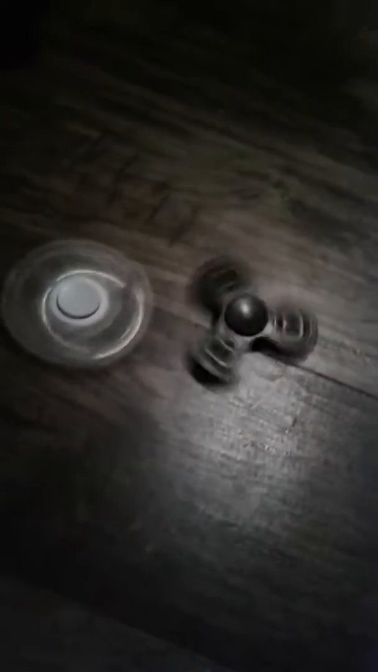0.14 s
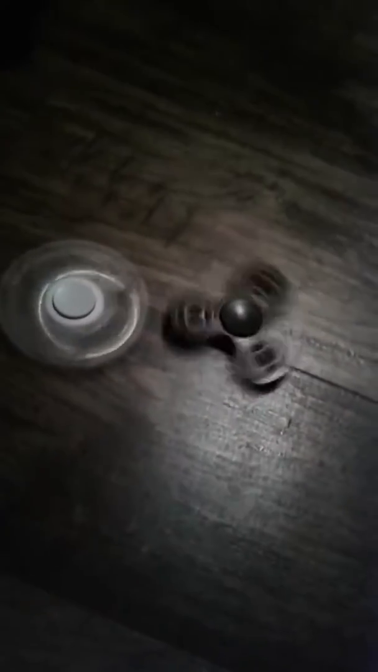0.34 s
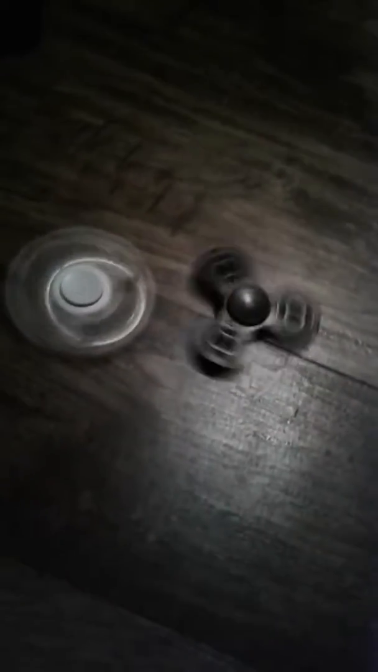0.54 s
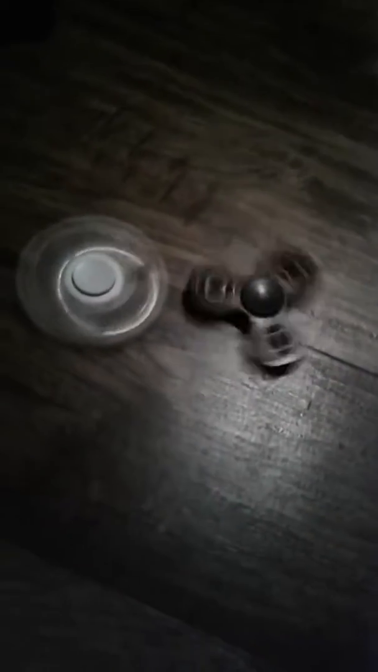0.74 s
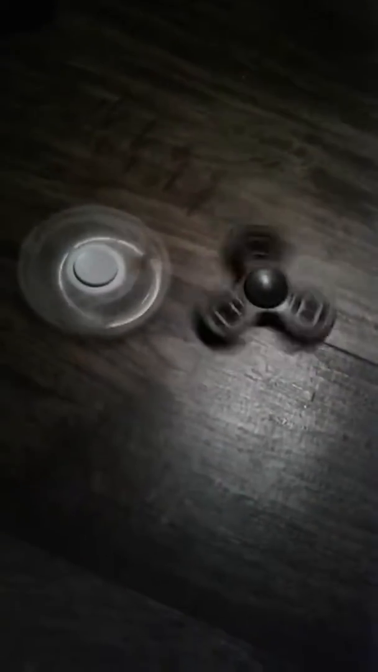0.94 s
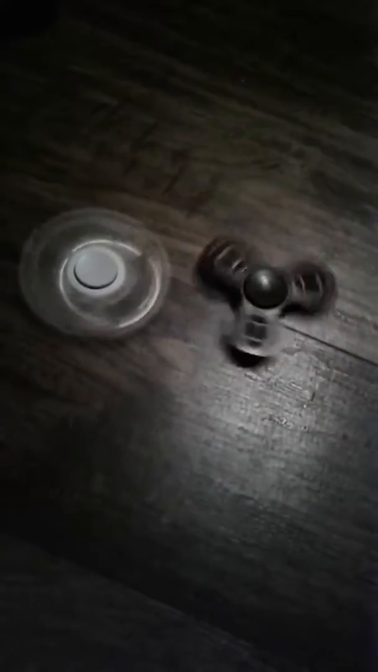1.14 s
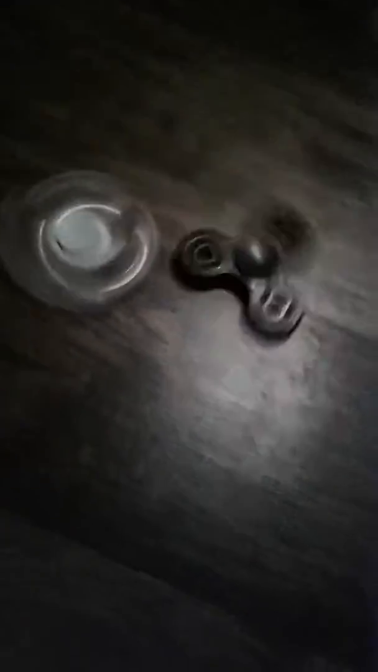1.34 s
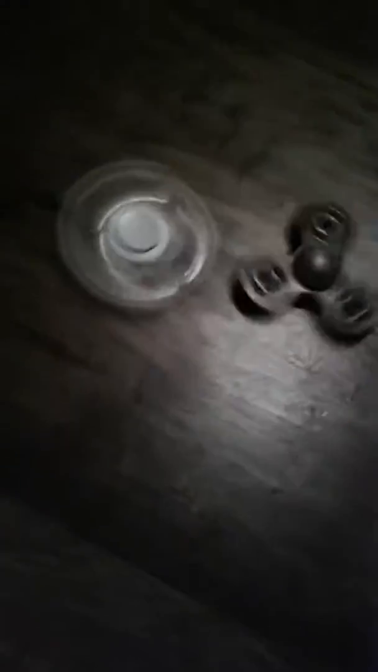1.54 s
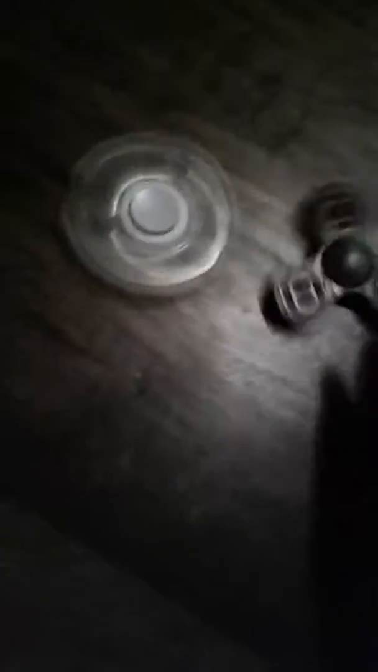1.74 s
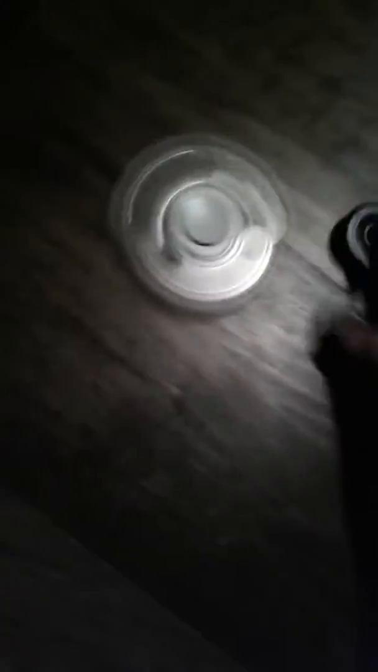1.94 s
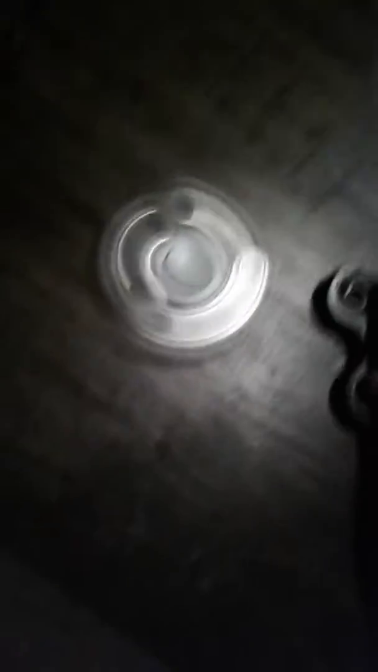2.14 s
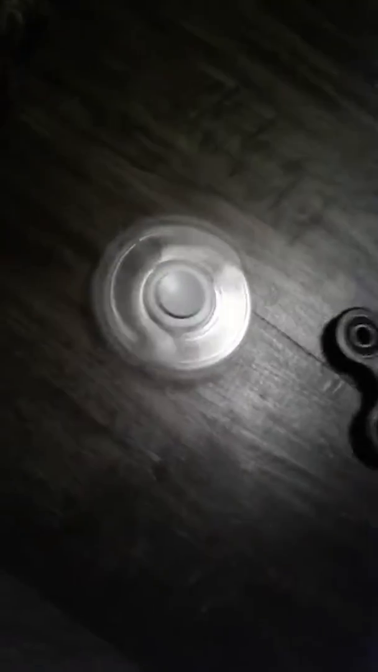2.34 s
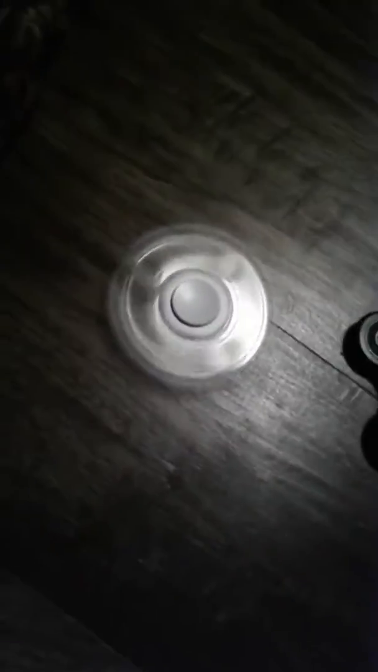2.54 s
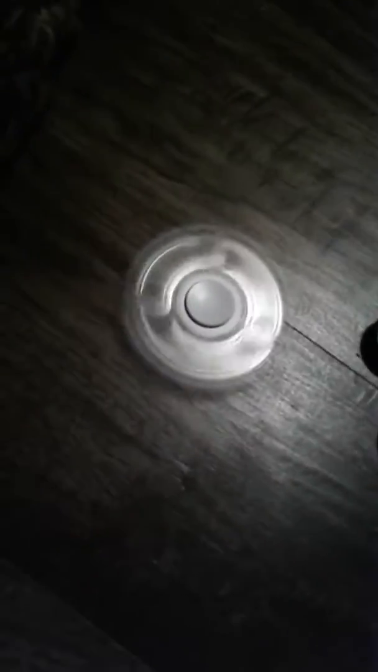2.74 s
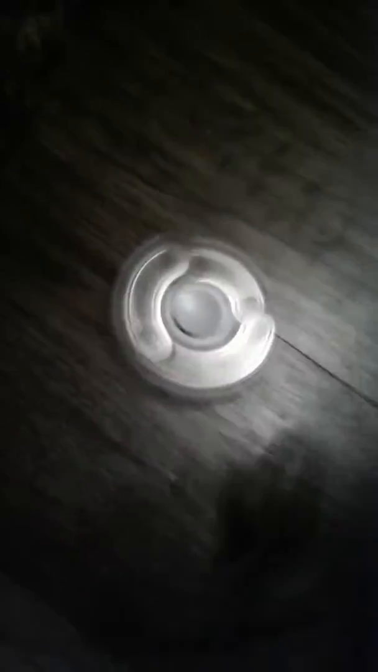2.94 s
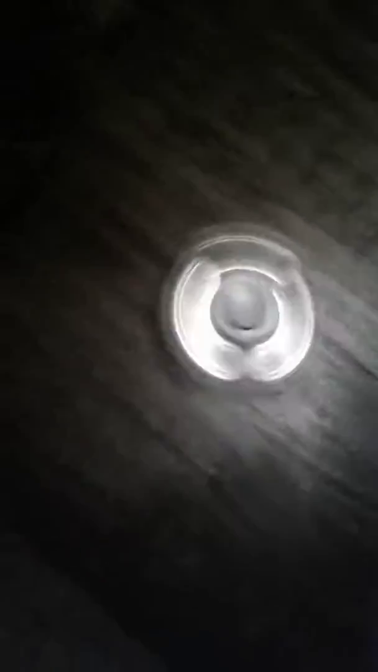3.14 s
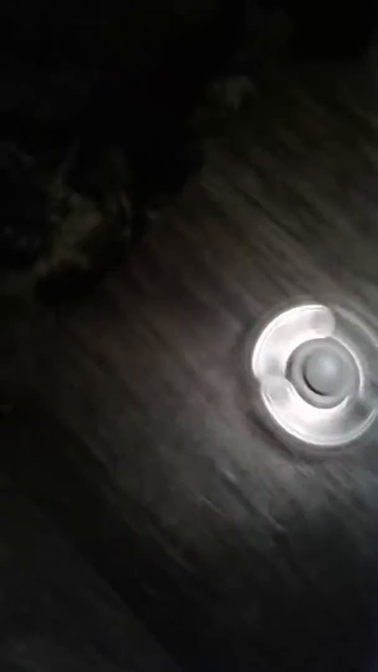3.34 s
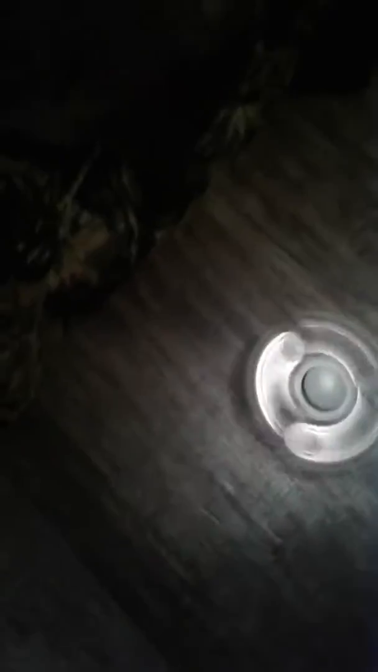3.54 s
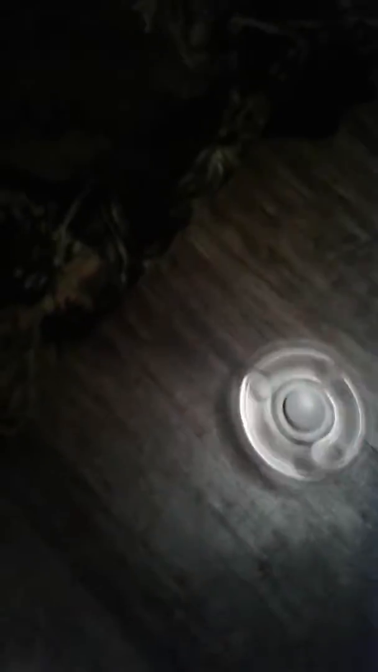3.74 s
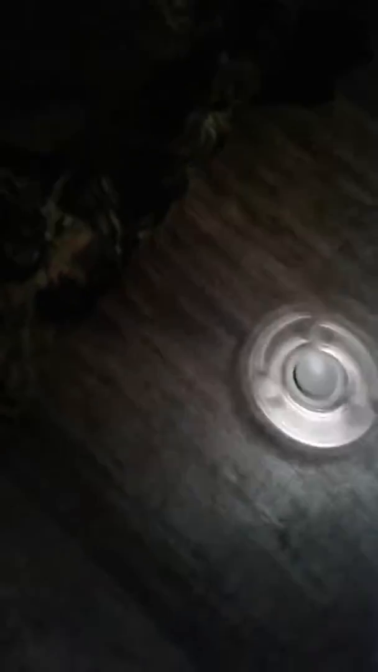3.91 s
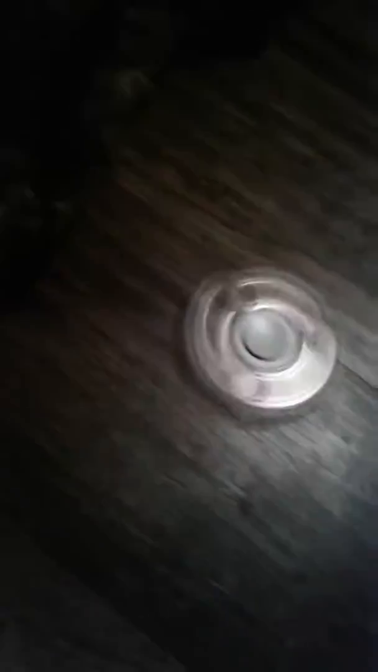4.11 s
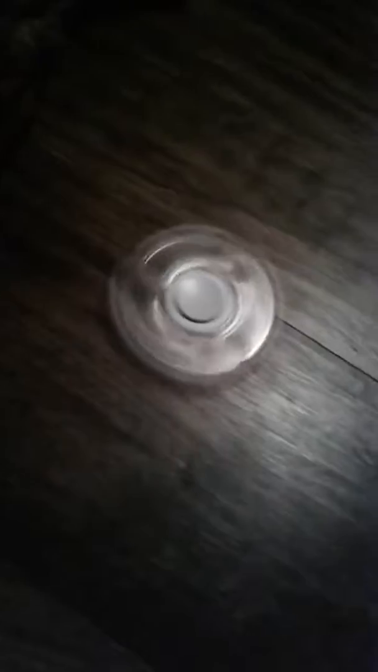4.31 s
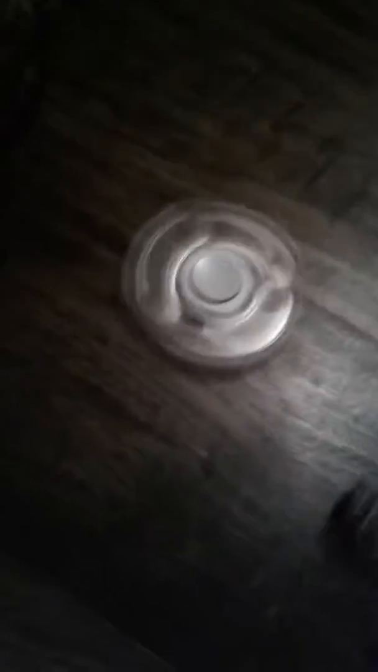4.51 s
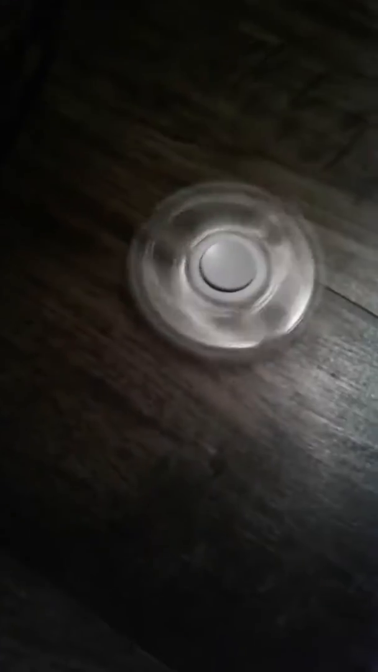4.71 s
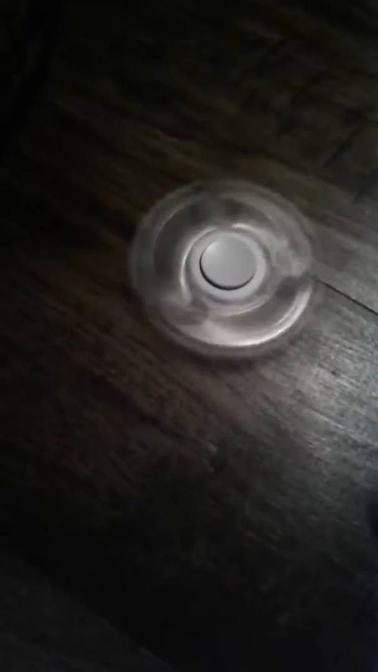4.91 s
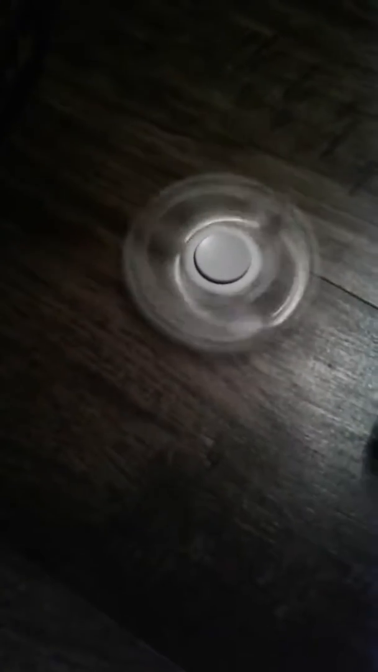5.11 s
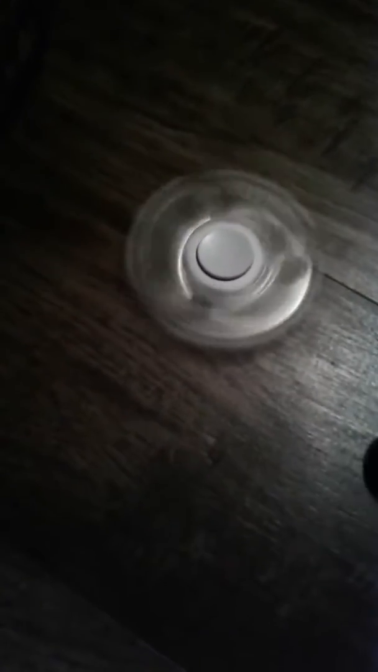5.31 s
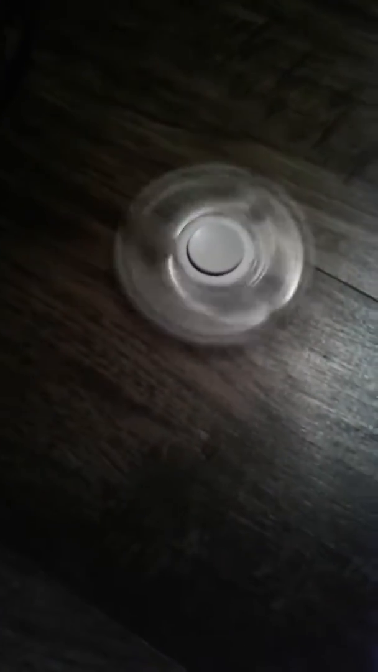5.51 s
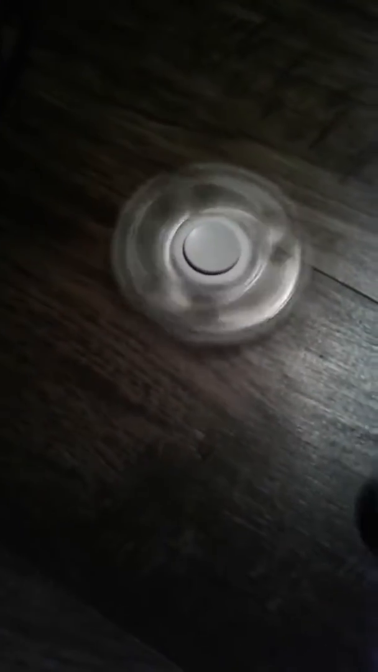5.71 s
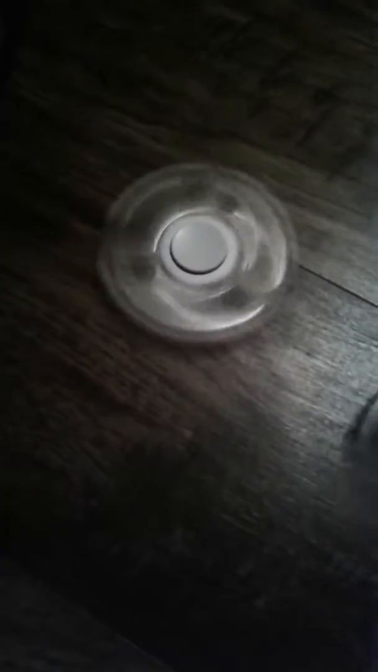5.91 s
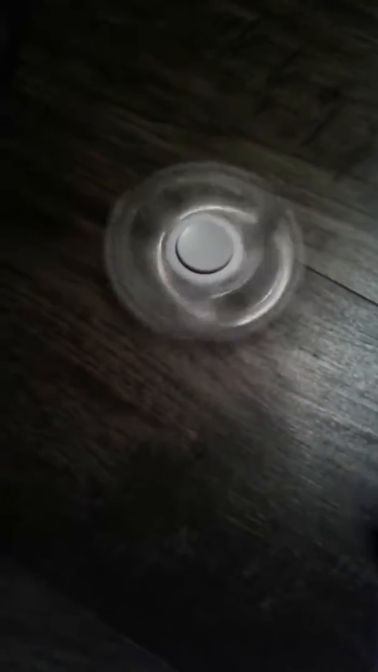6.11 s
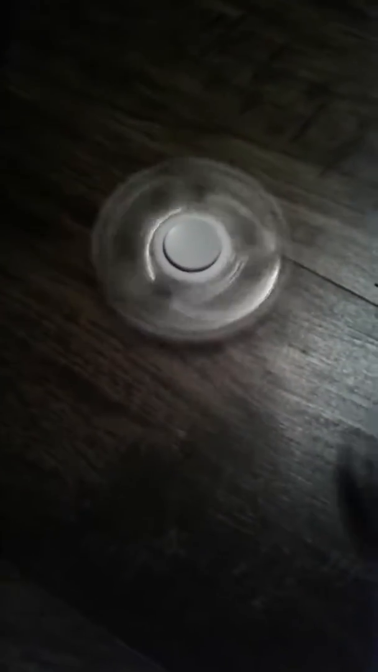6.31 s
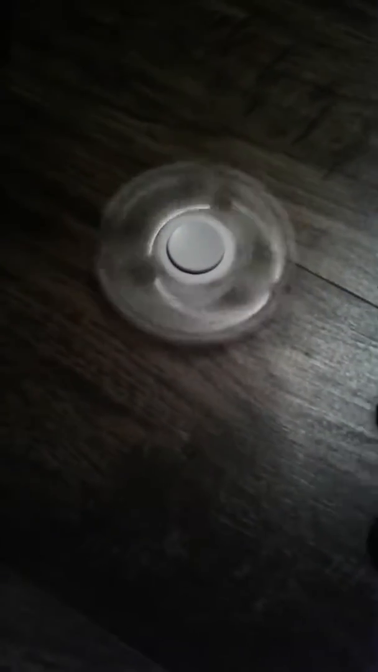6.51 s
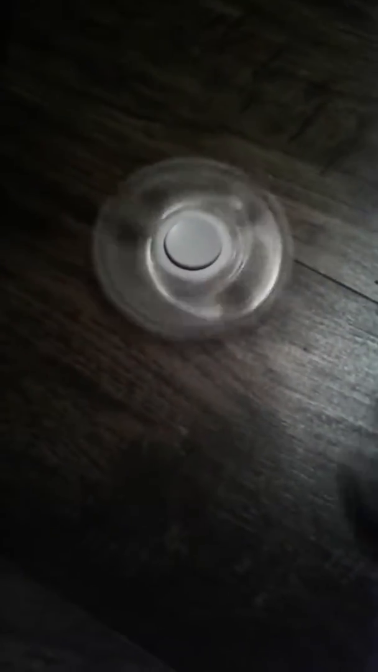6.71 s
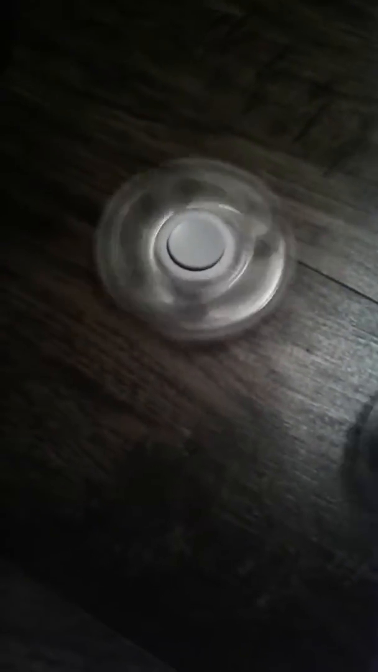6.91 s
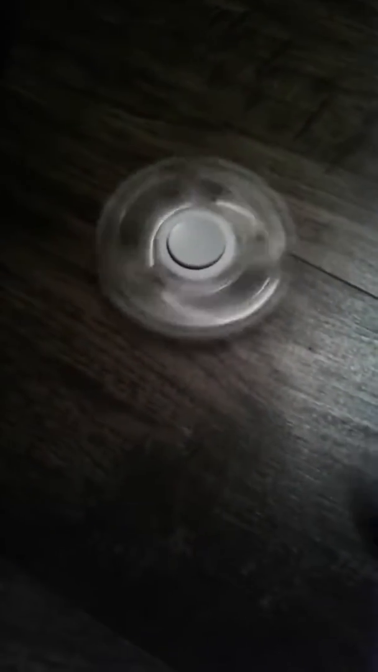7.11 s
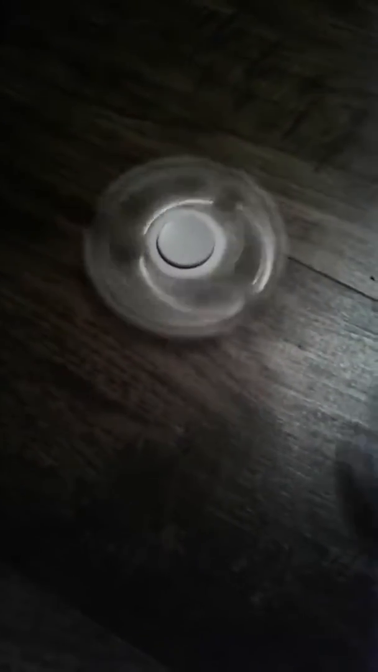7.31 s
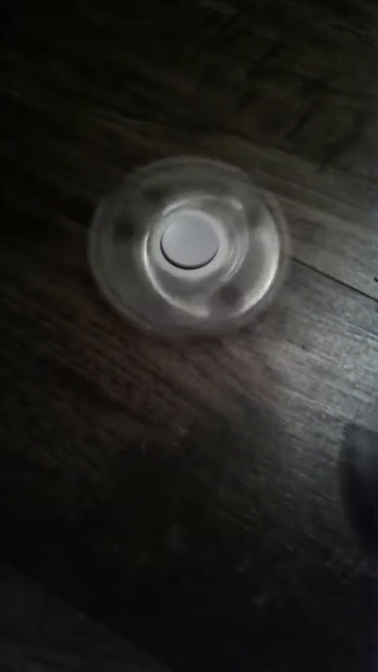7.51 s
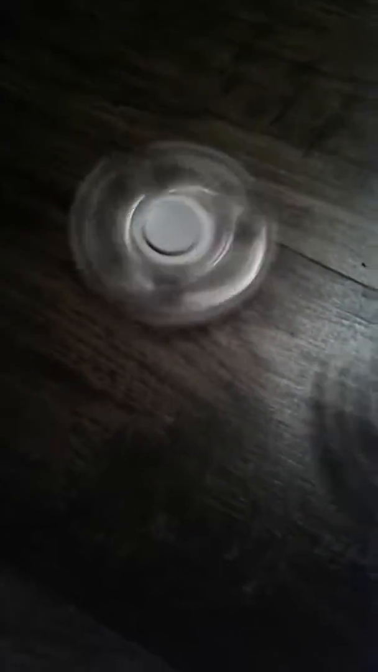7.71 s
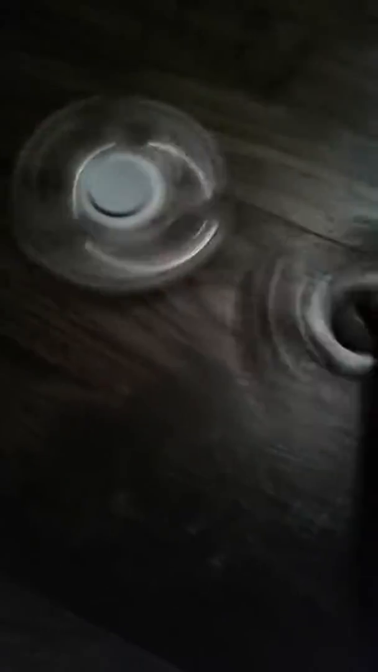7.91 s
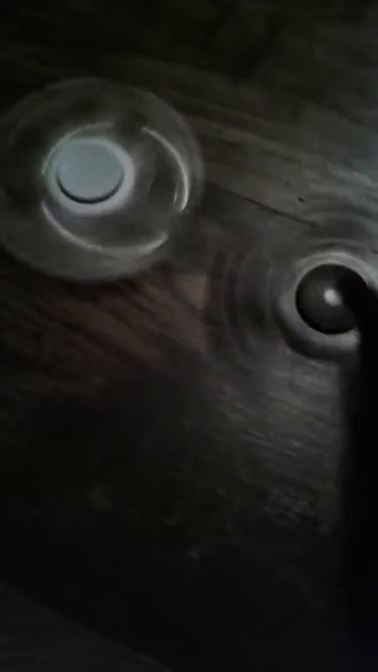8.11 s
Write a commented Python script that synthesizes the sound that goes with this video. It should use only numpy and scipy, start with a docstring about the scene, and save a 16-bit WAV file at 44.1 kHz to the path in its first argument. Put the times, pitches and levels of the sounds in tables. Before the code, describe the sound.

Close to a phone microphone in a small furnished room, a plastic spinner whirs continuously on a wooden table, a quiet hissy flutter. A light clack comes first, then a sudden loud burst of clattering plastic with woody thumps, a smaller knock, a short fizzy scrape, and finally scattered soft taps and low booms.

```python
"""A plastic spinner whirs on its ball bearing on a wooden table, close to a phone's microphone.
The whir is noise through the bearing's resonances plus stirred air, blended from far, side-on and overhead.
A hand drags, drops and flicks a second spinner beside it: gliding noise scrapes and noisy, ringing clacks.
Dull knocks, trembling and booms come from the table top's modes; a faint low murmur lies behind."""
import sys
import numpy as np
from scipy import signal
from scipy.fft import rfft, irfft, next_fast_len
from scipy.io import wavfile
from scipy.ndimage import uniform_filter1d, map_coordinates

SR = 44100
rng = np.random.default_rng(int(sys.argv[2]) if len(sys.argv) > 2 else 0)


def inscribe(sig):
    """Save sig as 16-bit PCM at rate SR to the path in sys.argv[1].

    A 1-D sig is mono; a 2-D sig holds one channel per row.
    Samples are clipped to [-1, 1] before scaling.
    """
    pcm = np.round(np.clip(np.atleast_2d(sig).T, -1, 1) * 32767)
    wavfile.write(sys.argv[1], SR, pcm.astype(np.int16))


N = 359415  # samples

# Low murmur behind the table. Each row: frequency in Hz, level in dB per Hz.
MURMUR_SPECTRUM = [(15, -30), (30, -14), (60, -19), (110, 1.5), (160, -15), (250, -27), (400, -120)]
# Resonances of the wooden top. Each row: centre in Hz, width in Hz, level in dB.
TABLE_MODES = [(160.4, 9.2, -6.5), (237.3, 27, 2), (344.4, 78, -2), (376.2, 92.4, -6), (578, 84, -18.5),
               (924, 250, -26)]
# Trembling of the table top, before its random unevenness. Each row: time in seconds, level in dB.
TREMBLE_LEVEL = [(0.0, -55), (1.13, -59), (2.31, -48), (2.56, -53), (2.97, -55.5), (3.13, -43), (3.22, -37),
                 (3.45, -59), (3.79, -52.5), (3.97, -51), (4.63, -41.5), (4.79, -47.5), (5.31, -48),
                 (7.58, -51), (7.83, -43), (8.15, -52.5)]
# Dull knocks in the wood. Each row: start in seconds, peak in dB, favoured tone in Hz.
KNOCKS = [(0.116, -52, 366), (0.181, -35, 354), (0.238, -36, 246), (0.263, -35.5, 264), (0.382, -51, 245),
          (0.425, -35, 270), (0.568, -42.5, 260), (0.672, -42, 272), (0.747, -48, 250), (1.141, -36, 336),
          (1.332, -36, 320), (1.39, -40, 260), (1.564, -36.5, 246.6), (1.584, -31.5, 250),
          (1.668, -43, 223), (1.78, -36, 261), (1.838, -42, 350), (2.042, -27, 340), (2.201, -43, 256),
          (2.354, -33.5, 280), (2.951, -14, 336), (3.042, -22.5, 257), (3.071, -19, 247), (3.11, -25, 251),
          (3.161, -23.5, 343), (3.245, -19.5, 330), (3.328, -24.5, 260), (3.365, -29, 347),
          (3.411, -35, 266), (3.752, -25, 348), (3.771, -16.5, 440), (3.948, -26.5, 377), (3.995, -27, 269),
          (4.136, -36, 330), (4.188, -29.5, 422), (4.23, -33, 265), (4.277, -29.5, 262), (4.565, -35, 256),
          (4.717, -30.5, 267), (4.859, -42, 249), (4.959, -37, 242), (5.002, -36, 266), (5.279, -43, 256),
          (5.341, -34.5, 261), (5.417, -29.5, 269), (5.619, -41, 274), (5.752, -48, 260), (5.786, -32, 212),
          (5.907, -40, 245), (6.155, -29.5, 260), (6.607, -25.5, 229), (6.739, -36, 275), (7.145, -32, 218),
          (7.295, -36, 236), (7.379, -37, 267), (7.487, -38.5, 256.4), (7.572, -49, 248), (7.605, -45, 230),
          (7.782, -35.5, 244), (7.955, -36, 260)]
# Firm touches shake the wood and boom in the table's frame, levels before their soft onsets.
# Each row: start in seconds, shake level in dB, boom level in dB, boom tone in Hz, boom t60 in seconds.
FIRM_TOUCHES = [(.96, -52, -39, 60, .1), (2.05, -32.5, -29, 107, .23), (2.949, -24, -25, 75, .12),
                (3.078, -27, -16, 68, .1), (3.12, -30, -31, 106, .35), (3.3, -30, -33, 103, .3),
                (3.764, -35, -36, 106, .3), (4.0, -31, -36, 109.5, .35), (5.362, -51, -41, 95, .25),
                (5.41, -39.5, -43, 80, .29), (5.77, -33.5, -38, 104, .33), (6.151, -31.5, -32, 108, .21),
                (6.589, -25, -23, 108.7, .25), (7.148, -29, -36, 102.5, .4)]

# Hard contacts, levels before mixing.
# Each row: start in seconds, snap and ring level in dB, middle tone level in dB, middle tone in Hz, t60 in seconds.
CLACKS = [(0.427, -36, -56, 596, .015), (.9594, -52, -40, 835, 0.02), (1.331, -42, -48, 620, .012),
          (2.0336, -23, -31.5, 594, 0.0095), (2.045, -21, -19, 950, 0.012), (2.057, -25, -30, 1180, 0.015),
          (2.074, -30, -43, 930, 0.018), (2.091, -24, -39, 960, .01), (2.9481, -16, -25, 580, .018),
          (2.9551, 0, -12, 1015, 0.013), (2.9722, -16, -22.5, 1000, 0.035), (3.0413, -8, -13.5, 910, 0.015),
          (3.0738, 2.5, -11.5, 920, 0.0086), (3.0816, 0.5, -10.5, 850, 0.01),
          (3.0973, -16, -10.5, 600, 0.0083), (3.1105, 2.5, -9, 570, 0.011), (3.125, -28, -23, 630, 0.026),
          (3.1502, -12, -34, 820, 0.038), (3.1695, -12.5, -31, 657, 0.032), (3.1855, -16, -33, 1050, 0.023),
          (3.206, -25, -22, 634, 0.013), (3.2354, -14, -36, 755, 0.028), (3.2474, -23, -17.5, 564, 0.0096),
          (3.269, -13.5, -29, 877, 0.017), (3.3114, -21.5, -43, 810, 0.026), (3.331, -19, -38, 666, 0.015),
          (3.3682, -33.5, -53, 830, 0.023), (3.753, -43, -37, 600, .01), (3.7655, -12, -16.5, 630, .015),
          (3.7742, -14, -15, 1150, .016), (3.996, -34, -27, 1150, 0.02), (4.0297, -30, -52, 654, .016),
          (4.0787, -29.5, -41, 600, 0.013), (4.143, -22.5, -39, 1130, 0.014),
          (5.3357, -25, -45, 1130, .013), (5.3982, -31, -40, 1510, 0.039), (5.4115, -26, -30, 1350, 0.029),
          (5.4264, -24, -41, 1340, 0.012), (5.7728, -22.5, -34.5, 1230, 0.014),
          (5.804, -28, -42.5, 608, 0.015), (5.8134, -22.5, -41, 641, .013), (6.1563, -30, -45, 1260, .017),
          (6.175, -28, -44, 1320, 0.02), (6.592, -33, -48, 595, .014), (6.6005, -22, -38.5, 1000, 0.022),
          (6.606, -19, -27, 1290, 0.0073), (6.6274, -33, -38, 1200, 0.021),
          (6.66, -22.5, -37.5, 620, 0.017), (6.721, -38, -53, 1940, .018), (7.1469, -29.5, -50, 678, 0.023),
          (7.1707, -24, -36, 994, 0.029), (7.1926, -28, -35, 630, .013)]
# Rings of the plastic, before a small random spread. Each row: frequency in Hz, level in dB, t60 in seconds.
PLASTIC_RINGS = [(6420, 19, 0.0069), (8000, -28.5, .025), (8100, -26, .02), (9500, -15, .035),
                 (9880, 5.5, 0.019)]
# The crack of a contact. Each row: frequency in Hz, level in dB per Hz.
CRACK_SPECTRUM = [(900, -120), (1600, 3), (2300, 3.5), (3500, 7), (4800, 3), (6500, -120)]
# The brighter snap of a contact. Each row: frequency in Hz, level in dB per Hz.
SNAP_SPECTRUM = [(2650, -32), (4500, -9), (5720, -7), (6800, -5), (7220, 0), (8830, 5.5), (10800, -38),
                 (15200, -14), (16500, -37)]

# Low scuff of plastic on wood. Each row: frequency in Hz, level in dB per Hz.
SCUFF_SPECTRUM = [(300, -40), (480, 0), (600, -3), (900, 0.5), (1150, -1.5), (1500, -40), (2500, -120)]
# Scrape above the scuff. Each row: frequency in Hz, level in dB per Hz.
SCRAPE_SPECTRUM = [(700, -120), (1050, -11), (1350, -4.5), (2000, -8.5), (2700, -10), (3500, -11.5),
                   (4500, -13.5), (5500, -44), (8000, -120)]
# Bright fizz of the drags. Each row: frequency in Hz, level in dB per Hz.
FIZZ_SPECTRUM = [(2600, -31), (4300, -14), (5100, -10), (5500, 0.5), (5850, 1), (6500, -1), (7200, -1),
                 (8800, -2), (9600, -7), (10000, -13.5), (11500, -30), (15100, -18.5), (15800, -24)]
# The long drag. Each row: time in seconds, scuff level in dB, scrape level in dB, fizz level in dB.
LONG_DRAG = [(4.11, -62, -68, -68), (4.16, -48, -48, -44), (4.25, -44, -43, -31), (4.33, -47, -40, -25),
             (4.38, -47, -38, -27), (4.45, -47, -34, -19), (4.52, -45, -35, -23), (4.6, -44, -41, -30),
             (4.64, -45, -44, -36), (4.71, -49, -46, -38), (4.79, -60, -60, -53), (4.86, -72, -68, -64)]
# Strokes over the wood. Each row: loudest moment in seconds, rise in seconds, fall in seconds,
# scuff level in dB, scrape level in dB, fizz level in dB.
STROKES = [(1.72, .22, .22, -60, -55, -50), (2.1, 0.046, 0.18, -58, -59.5, -65),
           (2.36, 0.15, 0.17, -57.5, -61.5, -50.5), (2.97, 0.029, 0.13, -48, -38.5, -34.5),
           (3.15, 0.05, 0.2, -38.5, -41, -36.5), (3.75, .03, .03, -46, -62, -70),
           (3.79, .03, .16, -44, -53, -56), (4.0, .05, .14, -45, -53, -60),
           (5.41, .03, 0.052, -62, -58, -38.5), (7.83, 0.19, 0.26, -65, -52, -40.5)]

# The running bearing as the phone moves.
# Each row: time in seconds, place (0 far, 1 side-on, 2 overhead), hiss level in dB, air level in dB.
SPINNER_PATH = [(0, 0.022, -53, -54.5), (.7, .03, -55, -57), (1.3, .1, -56, -55.5), (1.6, .7, -57, -52.5),
                (1.9, .85, -52.5, -50), (2.3, 0.94, -49.5, -49), (2.6, 1.11, -52, -52.5),
                (2.9, 1.01, -51.5, -52), (3.4, 1.4, -71, -56), (3.58, 1.14, -66, -59.5),
                (3.75, 1.07, -58, -49), (4.1, 1.55, -55.5, -56), (4.8, 1.76, -52.5, -52),
                (5.3, 1.75, -52, -53.5), (6.5, 1.93, -54, -51), (7.5, 1.8, -56, -51),
                (8.15, 1.5, -53, -51.5)]
# Passing of the spinner's arms. Each row: time in seconds, passes per second.
ARM_PASSES = [(0, 31.3), (5.2, 28), (8.15, 24)]
# Race and arms from far, side-on and overhead, one list each. Each row: centre in Hz, width in Hz, level in dB.
BEARING_MODES = [
    [(5130, 640, -9.5), (5940, 200, -2.5), (6720, 200, 4.5), (7500, 850, -0.5), (9130, 400, 0.5)],
    [(5000, 320, -12.5), (5880, 130, -19), (6950, 300, -10), (7490, 430, -4), (8990, 120, 0)],
    [(4650, 280, -16), (5870, 230, -11.5), (6840, 123, 2), (7550, 330, -7), (8770, 110, -7)],
]
# Stirred air and room from far. Each row: frequency in Hz, level in dB per Hz.
AIR_FAR = [(250, 0), (420, 2.5), (527, -8.5), (884, -7), (1500, -16), (2130, -8), (2330, -19), (2760, -17),
           (2980, -24.5), (4350, -36), (5220, -28), (6750, -17), (9290, -13), (11000, -43), (15800, -18.5)]
# Stirred air and room from side-on. Each row: frequency in Hz, level in dB per Hz.
AIR_SIDE_ON = [(250, -38), (420, -7.5), (683, -22), (939, -21), (1160, -15.5), (1620, -16), (1860, -14),
               (2040, -14.5), (3410, -21.5), (5140, -13.5), (6550, -19), (7510, -3), (9150, -9.5),
               (11500, -39), (15800, -13.5)]
# Stirred air and room from overhead. Each row: frequency in Hz, level in dB per Hz.
AIR_OVERHEAD = [(250, -52), (420, -52), (527, -1.5), (983, -8), (1080, -15), (1220, -5.5), (2070, -10.5),
                (3310, -26.5), (4690, -14.5), (5300, -36), (6360, -42), (6960, -15), (9010, -5),
                (11500, -36), (15800, -15.5)]


def amp(db):
    """Gain of a level in dB."""
    return 10 ** (np.asarray(db) / 20)


def unit(x):
    """Scale to rms 1."""
    return x / np.sqrt(np.mean(x ** 2) + 1e-20)


def along(points, hz):
    """Read (Hz, value) points on a log frequency axis."""
    f, v = np.transpose(points)
    return np.interp(np.log(hz + 1), np.log(f + 1), v)


def curves(rows):
    """One value per sample for each column after the time."""
    s, *cols = np.transpose(rows)
    return [np.interp(np.arange(N) / SR, s, c) for c in cols]


def wobble(rate):
    """A smooth random curve with `rate` knots a second."""
    knots = rng.standard_normal(int(N * rate / SR) + 4)
    return map_coordinates(knots, [np.arange(N) * rate / SR])


def filtered(x, response):
    """Multiply the spectrum of x by a response of frequency."""
    m = next_fast_len(len(x) + 8192)
    return irfft(rfft(x, m) * response(np.fft.rfftfreq(m, 1 / SR)), m)[:len(x)]


def modes(table):
    """Causal response of (Hz, width, dB) resonances, summed with alternating sign."""
    def response(f):
        total = 0
        for k, (centre, width, db) in enumerate(table):
            damping = 1j * f * width
            total = total + (-1) ** k * amp(db) * damping / (centre ** 2 - f ** 2 + damping)
        return total
    return response


def shape(points):
    """Gain of a spectrum table, silent up to its first frequency."""
    return lambda hz: amp(along(points, hz)) * (hz > points[0][0])


def noise(response, patchy_db, grain_db):
    """Noise of rms 1 with a fast grain and patches of random gain over time and frequency."""
    grain = amp(grain_db * np.resize(wobble(400), N + 512))
    z = signal.stft(rng.standard_normal(N + 512) * grain, nperseg=512)[2]
    field = uniform_filter1d(rng.standard_normal(z.shape), 6, 0)  # over frequency
    field = uniform_filter1d(field, 10, 1)  # over time
    patchy = signal.istft(z * amp(patchy_db * unit(field)), nperseg=512)[1][:N]
    return unit(filtered(patchy, response))


def add_at(track, s, sound):
    """Add a sound to a track from s seconds on."""
    track[round(s * SR):][:len(sound)] += sound


def room(x):
    """A small furnished room answers with a short, decaying noise tail."""
    t = np.arange(SR // 3) / SR
    tail = rng.standard_normal(len(t)) * amp(-60 * t / 0.46) * (t > .004)
    return signal.fftconvolve(x, tail / np.linalg.norm(tail))[:N]


def murmur():
    """A faint, slowly uneven low noise behind the table."""
    return amp(-66 + 2.3 * wobble(6.7)) * noise(shape(MURMUR_SPECTRUM), patchy_db=1, grain_db=0)


def table_top():
    """Soft blows excite the wood's modes and leave it trembling; firm touches also boom in the frame."""
    after_db, after_t60 = -12.5, 0.29  # trembling left by a knock: level under its peak, s
    shake_rise_s, shake_t60 = .015, .35
    out, power, t = np.zeros(N + SR), np.zeros(N + SR), np.arange(SR // 2) / SR
    push = np.pad(np.hanning(round(0.0019 * SR)), (0, SR // 8))  # a soft contact lasts about two milliseconds
    for s, db, hz in KNOCKS:
        wood = modes(TABLE_MODES + [(hz, 60, 4)])  # where the blow lands favours one tone
        thud = filtered(push, lambda f: wood(f) * (1j * f / (90 + 1j * f)) ** 2)
        add_at(out, s, amp(db) * thud / np.abs(thud).max())
        add_at(power, s, amp(db + after_db - 60 * t / after_t60) ** 2)

    waver = .8 * wobble(22)  # the boom's phase drifts, radians
    for s, shake_db, boom_db, hz, t60 in FIRM_TOUCHES:
        swell = amp(boom_db - 60 * t / t60) * (1 - np.exp(-t / 0.035))
        phase = 2 * np.pi * hz * t + waver[round(s * SR):][:len(t)]
        add_at(out, s, swell * np.sin(phase))
        shake = amp(shake_db - 60 * t / shake_t60) * (1 - np.exp(-t / shake_rise_s))
        add_at(power, s, shake ** 2)

    uneven = amp(2.1 * wobble(35)) * rng.standard_normal(N)
    wood_noise = unit(filtered(uneven, lambda f: modes(TABLE_MODES)(f) * f ** 2 / (f ** 2 + 120 ** 2)))
    lasting = amp(curves(TREMBLE_LEVEL)[0] + 2.65 * wobble(14))
    return np.sqrt(lasting ** 2 + power[:N]) * wood_noise + out[:N]


def clacks():
    """Each hard contact bursts into snap and crack, rings the plastic and sounds a rough middle tone in the wood."""
    out, t = np.zeros(N + SR), np.arange(SR // 8) / SR
    for s, db, middle_db, middle_hz, t60 in CLACKS:
        ring = np.zeros(len(t))
        for hz, level, life in PLASTIC_RINGS:
            decay = amp(level + rng.normal(0, 1) - 60 * t / life)
            ring += decay * np.sin(2 * np.pi * hz * t * rng.normal(1, 0.011))
        rise_s = .00045 + .000008 * max(-db, 0)  # weaker contacts start more slowly
        onset = 1 - np.exp(-t / rise_s)
        fade = amp(-60 * t / t60)
        snap = unit(filtered(rng.standard_normal(len(t)), shape(SNAP_SPECTRUM)))
        crack = unit(filtered(rng.standard_normal(len(t)), shape(CRACK_SPECTRUM)))
        rough = unit(filtered(rng.standard_normal(len(t)), modes([(middle_hz, 550, 0)])))
        middle = 1.05 * rough + 1.3 * np.sin(2 * np.pi * middle_hz * t)
        crack_gain = amp(2 + 1.5 * middle_db)  # follows the middle tone, but more steeply
        bright = amp(db) * (.72 * snap * fade + .055 * ring)
        wooden = (crack_gain * crack + amp(middle_db) * middle) * fade
        add_at(out, s, onset * (bright + wooden))
    return out[:N]


def drags():
    """Plastic slides over wood grain: scuff, scrape and a brighter fizz that stutter together."""
    swell = 2.36  # how pointed a stroke's rise and fall are
    layers = [noise(shape(SCUFF_SPECTRUM), patchy_db=3.0, grain_db=3.0),
              noise(shape(SCRAPE_SPECTRUM), patchy_db=2.6, grain_db=1.2),
              noise(shape(FIZZ_SPECTRUM), patchy_db=2.4, grain_db=1.4)]
    t = np.arange(N) / SR
    dragging = (t > LONG_DRAG[0][0]) * (t < LONG_DRAG[-1][0])
    power = amp(curves(LONG_DRAG)) ** 2 * dragging
    for s, rise, fall, *levels in STROKES:
        away = np.clip(np.where(t < s, (s - t) / rise, (t - s) / fall), 0, 1)
        power += (amp(levels)[:, None] * np.cos(np.pi / 2 * away) ** swell) ** 2
    stutter = amp(1.3 * wobble(110))
    return stutter * (np.sqrt(power) * layers).sum(axis=0)


def spinner():
    """Balls rolling in the race excite its resonances and the arms stir air, throbbing with the arm passes."""
    place, hiss_db, air_db = curves(SPINNER_PATH)
    nearness = np.clip(1 - np.abs(place - np.arange(3)[:, None]), 0, 1)
    share = np.sqrt(nearness)  # equal-power blend of the three places
    passes = np.sin(2 * np.pi * np.cumsum(curves(ARM_PASSES)[0]) / SR)
    throb_db = 1.12 * passes + 0.93 * wobble(16)
    hiss = [noise(modes(race), patchy_db=.9, grain_db=1.7) for race in BEARING_MODES]
    air = [noise(shape(view), patchy_db=.9, grain_db=2.5) for view in (AIR_FAR, AIR_SIDE_ON, AIR_OVERHEAD)]
    whir = share * (amp(hiss_db) * hiss + amp(air_db) * air)
    return amp(throb_db) * whir.sum(axis=0)


def scene():
    """Everything at the one microphone; the room answers the clacks."""
    hits = clacks()
    return (murmur() + table_top() + amp(-12.0) * room(hits) + hits + drags() + spinner())[None]


def record(dry):
    """The phone rounds off the loudest peaks, drops the deep bass, weakens the top edge and keeps nothing above it."""
    top_hz, edge_hz = 15800, 17000
    held = dry[0] / (1 + np.abs(dry[0] / .9) ** 4) ** (1 / 4)

    def response(hz):
        bass_cut = hz ** 4 / (hz ** 4 + 40 ** 4)
        return bass_cut * np.where(hz < top_hz, 1, amp(-34)) * (hz < edge_hz)
    return filtered(held, response)[None]


dry = scene()
out = record(dry)
inscribe(out)
```